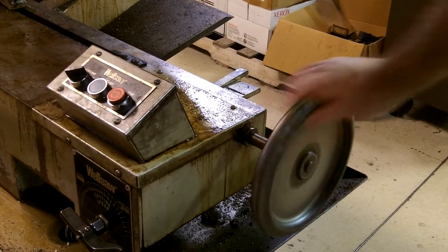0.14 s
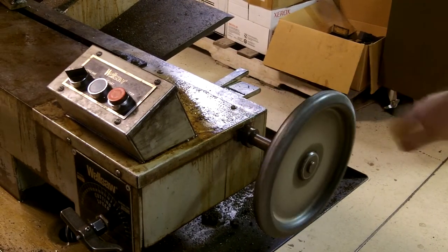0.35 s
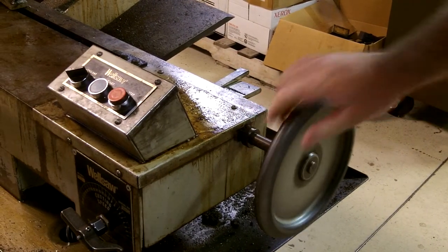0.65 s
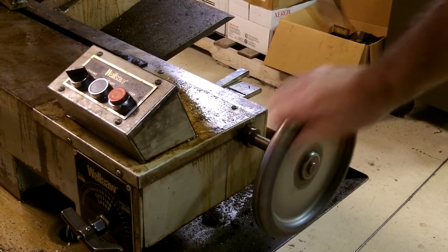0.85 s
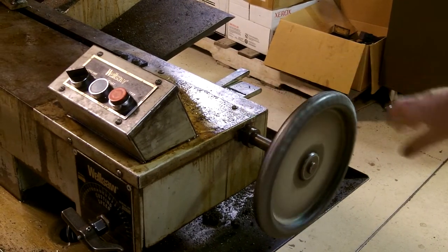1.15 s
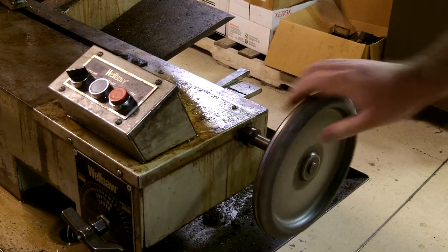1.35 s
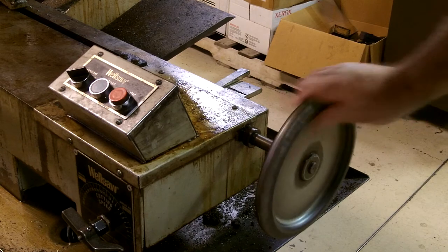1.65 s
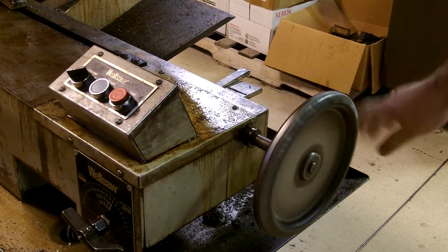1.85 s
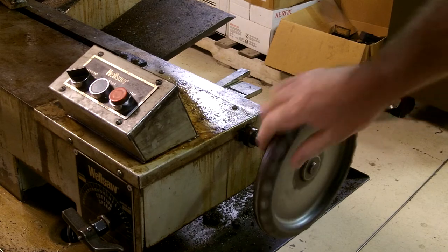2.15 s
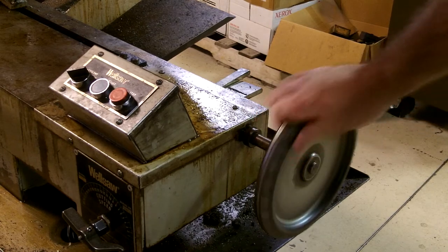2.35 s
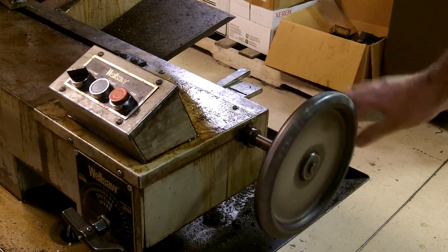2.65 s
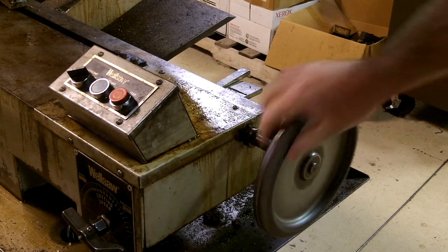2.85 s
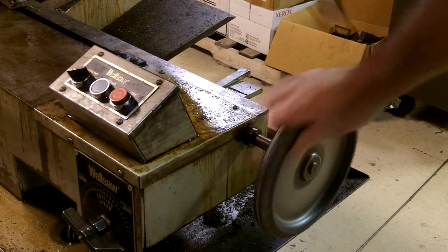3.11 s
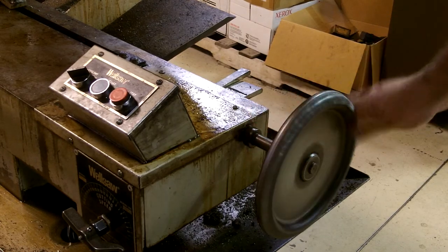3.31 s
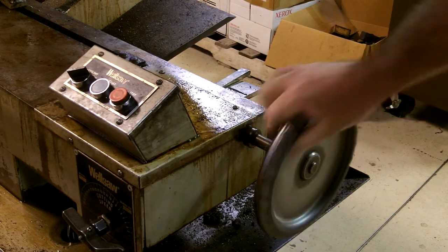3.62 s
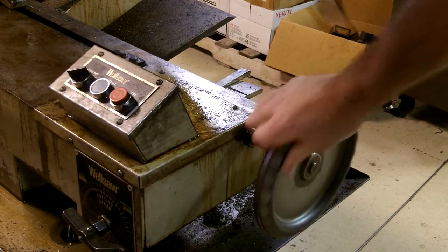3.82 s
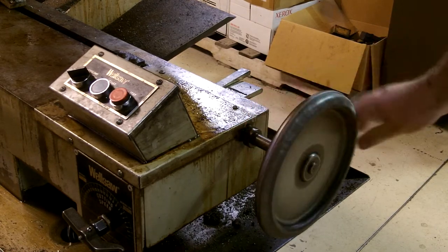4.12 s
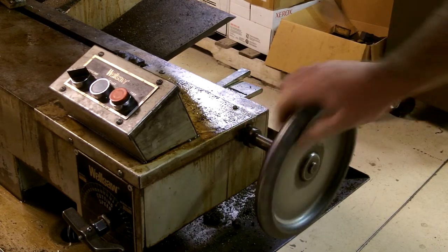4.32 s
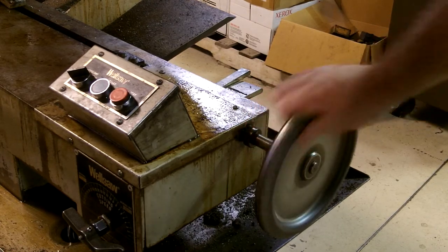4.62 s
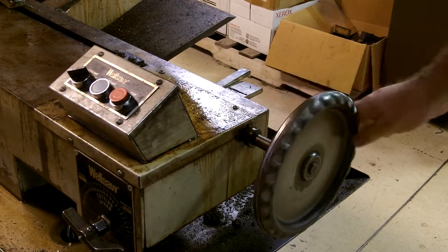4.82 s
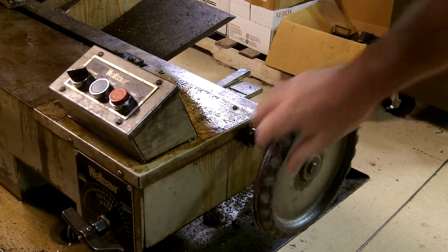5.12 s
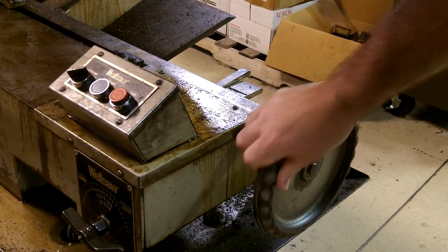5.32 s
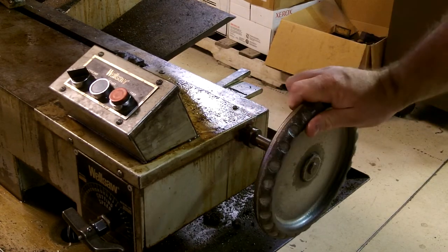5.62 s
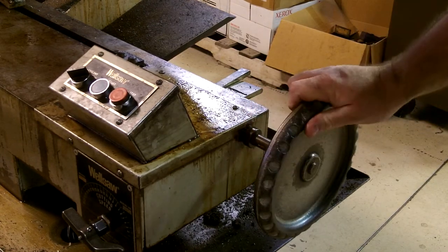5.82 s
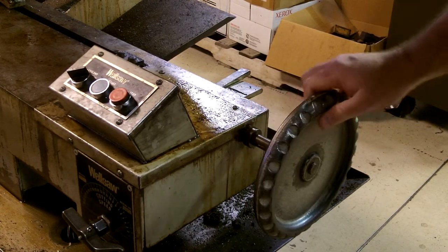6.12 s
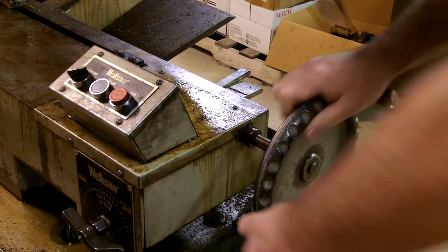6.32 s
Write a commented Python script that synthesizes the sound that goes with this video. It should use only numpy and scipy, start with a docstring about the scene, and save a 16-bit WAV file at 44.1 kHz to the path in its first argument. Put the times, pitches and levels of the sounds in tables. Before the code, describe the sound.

Metal clacks and gritty ringing scraping, three short squeaks, then a dull closing thud, with a fan rushing and a thin pulsing whine behind.

```python
"""In a workshop, a hand spins the steel feed wheel of a machine vise while a fan runs behind it.
Filtered noise and faint sines make the fan; short sagging tones pulse as a high whine like a cricket's trill.
The screw's slack takes up with two clacks of damped noise, and the jaw scrapes along its ringing bed as
many tiny catches drive its resonances. Stick and slip in the dry screw squeaks three times, as harmonics
with a breaking pitch, and the jaw closes with a thud of low decaying sines. The whine stops now and then."""
import sys
import numpy as np
from scipy import signal
from scipy.fft import rfft
from scipy.io import wavfile
from scipy.ndimage import uniform_filter1d

SR = 44100
rng = np.random.default_rng(int(sys.argv[2]) if len(sys.argv) > 2 else 0)


def waveform_to_disk(signal):
    """Save audio, clipped to [-1, 1], as 16-bit WAV at the path in sys.argv[1]."""
    frames = np.transpose(np.atleast_2d(signal))
    scaled = np.clip(frames, -1, 1) * 32767
    samples = np.round(scaled).astype(np.int16)
    wavfile.write(sys.argv[1], SR, samples)


N = 284886
TIME = np.arange(N) / SR

# Levels in the tables are relative: the functions still shape and mix them.
# Fan and workshop air. Each row: frequency in Hz, density in dB per Hz.
AIR_SPECTRUM = [(20, -4.5), (24, 6), (35, 0.5), (80, -4), (125, -2.5), (160, -1), (280, 3.5), (330, -3),
                (480, -1), (680, -5.5), (930, 1), (1120, -6), (1350, -3), (1700, -6.5), (2300, -7),
                (3300, -11.5), (4700, -17.5), (6300, -13.5), (7500, -61.5)]
# Steady tones of the fan motor. Each row: frequency in Hz, level in dB.
MOTOR_TONES = [(145.3, -55), (861.3, -55), (958.2, -52.5), (1981, -55.5), (2056, -57), (2132, -60.5),
               (2643, -59.5), (3962, -82), (4199, -62.5)]
# Microphone hiss. Each row: frequency in Hz, density in dB per Hz.
HISS_SPECTRUM = [(3000, -1), (7000, -74), (8500, 7.5), (9500, 12), (11000, 9), (13000, 8), (15000, 2)]
# Stretches of the trill. Each row: start in seconds, stop in seconds.
TRILL_SPANS = [(.075, 1.414), (1.592, 2.61), (2.775, 5.04), (5.243, 6.46)]
# Course of one wing stroke. Each row: share of the stroke from 0 to 1, mean pitch in Hz, level in dB.
WING_STROKE = [(0, 5800, -24), (.13, 5740, -6), (.3, 5650, 1), (.47, 5590, -3.5), (.62, 5400, -5),
               (.8, 5175, -12), (1, 5040, -30)]
# The wheel shoves the jaw, which gathers speed and coasts to rest.
# Each row: start in seconds, rise in seconds, grinding level in dB, fade in dB per second.
JAW_SHOVES = [(.17, 0.13, -32, 60), (.605, .055, -27.5, 67), (1.045, 0.012, -43, 49),
              (5.352, 0.017, -34, 400)]
# The sliding jaw sticks and judders. Each row: start in seconds, length in seconds, ringing level in dB.
JAW_JUDDERS = [(0.172, 0.033, -22.5), (.237, .009, -23.5), (0.265, 0.034, -28.5), (.328, 0.012, -21),
               (0.419, 0.0091, -28.5), (.613, 0.034, -25), (0.646, .017, -24), (0.696, 0.022, -27),
               (0.731, 0.022, -37), (0.807, 0.013, -20), (.883, 0.0081, -19.5)]
# Modes of the jaw and its bed. Each row: frequency in Hz, width in Hz, level in dB.
BED_MODES = [(1736, 57, -35), (1947, 34, -10), (2838, 30, 4.5), (3458, 40, 1.5), (3700, 65, -9),
             (3800, 26, 1.5), (4240, 130, -12), (5000, 23, -34)]
# Colour of the grinding. Each row: frequency in Hz, density in dB per Hz.
GRIND_SPECTRUM = [(100, -33), (220, -0.5), (350, 3.5), (600, -2), (850, 0.5), (1100, -6.5), (1400, 1),
                  (2200, -12), (3300, -3), (4300, -10), (5500, -10), (7000, -45), (12000, -64)]
# Steel knocking on steel.
# Each row: start in seconds, level in dB, 60 dB decay in seconds, centre of the colour in Hz.
STEEL_CLACKS = [(0.1763, -9.5, 0.019, 4080), (.1798, -19, .05, 3940), (.2045, -11.5, 0.031, 2920),
                (0.2055, -9.5, 0.027, 3500), (.2109, -21, 0.041, 1700), (.6458, -18, 0.043, 3750),
                (2.121, -30.5, .014, 3500), (4.904, -35, 0.048, 5500), (5.386, -33, 0.024, 5500),
                (5.387, -30, 0.07, 640)]
# Colour of a clack. Each row: frequency as a multiple of the centre, density in dB per Hz.
CLACK_SPECTRUM = [(.04, -14), (.12, -16), (.35, -11.5), (.7, 1.5), (1, 1.5), (1.35, -4.5), (1.8, -17),
                  (2.6, -36), (4, -56)]
# Dull bumps of the jaw and the hand.
# Each row: start in seconds, level in dB, pitch in Hz, 60 dB decay in seconds.
DULL_THUDS = [(.332, -29, 343, .08), (0.955, -22.5, 324.5, 0.052), (5.3872, -20.5, 300, 0.049),
              (5.398, -19.5, 249, 0.078)]
# Squeaks of the screw. Each row: moment of the bite in seconds, bite level in dB, gripping pitch in Hz,
# sag in the bite in Hz, change per overtone in dB, lead-in in seconds, lead-in pitch in Hz,
# lead-in level in dB, hold in seconds, hold level in dB, lingering level in dB.
SCREW_SQUEAKS = [(1.24, -15.5, 1293, 78, 4.5, .016, 1500, -39, .033, -24, -34),
                 (1.759, -26.5, 1968, 58, -9, .016, 2050, -40, 0.026, -32, -58),
                 (2.715, -24, 1317, 34, 4, .044, 1880, -29, 0.015, -19, -42)]
# How the screw radiates. Each row: frequency in Hz, gain in dB.
SCREW_RADIATION = [(1200, 2), (2600, 2), (3700, 3), (4200, -19.5), (5100, -17), (6500, -32), (10000, -62)]

AIR_DB = -38
ROOM_T60_S = 0.41
CUTOFF_HZ = 15050
JUDDER_ATTACK_S, JUDDER_RELEASE_S = 0.0041, 0.0042
JUDDER_GRIND_DB = -10  # grinding strength against ringing strength, before the jaw's own trims
# a tick as each judder breaks loose; its level is set against that judder's ringing strength
TICK_DELAY_S, TICK_DB, TICK_T60_S, TICK_HZ = 0.0015, -9, 0.036, 3260
BITE_S = 0.0037  # half-length of the hardest grip
BREAK_AHEAD_S, BREAK_S = 0.00774, 0.0023  # the pitch breaks this long before the bite, and this fast
SQUEAK_ATTACK_S, SQUEAK_RELEASE_S = 0.0084, 0.0017
BRIGHTENING = 0.51  # dB per overtone for each dB of level
# roughness of the held tone, extra at the break, and half-length of that extra
RASP, BREAK_RASP, RASP_S = 0.056, 0.57, 0.013
LEAD_RASP, LINGER_RASP = 0.1, 0.33  # extra roughness before the thread grips, and as the grip loosens
LINGER_S, LINGER_RELEASE_S = 0.063, 0.01  # the screw sings on faintly after the hold, then dies away


def from_db(db):
    """Decibels to gain."""
    return 10 ** (np.asarray(db) / 20)


def rms_one(x):
    """Scale to unit power."""
    return x / np.sqrt(np.mean(x ** 2) + 1e-20)


def along(rows, where):
    """Each column of a table, read along its first one."""
    first, *columns = np.transpose(rows)
    return [np.interp(where, first, column) for column in columns]


def gain_at(spectrum, hz):
    """Gain of a spectrum, joined on a log-frequency axis."""
    points, level_db = np.transpose(spectrum)
    return from_db(np.interp(np.log(hz + 1e-6), np.log(points), level_db))


def coloured(x, spectrum, unit_hz=1):
    """Give a signal a spectrum, at unit power."""
    hz = np.fft.rfftfreq(len(x), 1 / SR)
    shaped = rfft(x) * gain_at(spectrum, hz / unit_hz)
    return rms_one(np.fft.irfft(shaped, len(x)))


def lowpass(x, order, hz):
    """Roll off the treble."""
    return signal.sosfilt(signal.butter(order, hz, fs=SR, output="sos"), x)


def resonate(x, hz, width_hz):
    """One resonance with unit gain on top."""
    r = np.exp(-np.pi * width_hz / SR)
    feed = np.array([1, 0, -1]) * (1 - r * r) / 2
    return signal.lfilter(feed, [1, -2 * r * np.cos(2 * np.pi * hz / SR), r * r], x)


def envelope(t, attack_s, hold_s, release_s):
    """Rise from time zero, hold until hold_s, then die away."""
    return np.clip(t / attack_s, 0, 1) * np.exp(-np.maximum(t - hold_s, 0) / release_s)


def add(out, s, sound):
    """Mix a sound in at a time in seconds."""
    part = out[max(round(s * SR), 0):][:len(sound)]
    part += sound[:len(part)]


def room(x, wet_db, dull_hz, fresh_s=0.025):
    """The direct sound plus the workshop's dense reflections, which lose their treble as they die."""
    t = TIME[:SR]
    bright = rng.standard_normal(SR)
    dull = lowpass(bright, 2, min(dull_hz, 0.45 * SR))
    fresh = np.exp(-t / fresh_s)
    decay = from_db(-60 * t / ROOM_T60_S) * (t > 0.004)  # a short gap before the reflections
    tail = (fresh * bright + (1 - fresh) * dull) * decay / np.linalg.norm(decay)
    return x + from_db(wet_db) * signal.fftconvolve(x, tail)[:N]


def fan(hum_db=-1.0, wander=0.012):
    """Rushing air and the motor's faint tones, whose phases wander slightly."""
    sound = from_db(AIR_DB) * coloured(rng.standard_normal(N), AIR_SPECTRUM)
    for hz, db in MOTOR_TONES:
        drift = wander * np.cumsum(rng.standard_normal(N))
        sound += from_db(db + hum_db) * np.sqrt(2) * np.sin(2 * np.pi * hz * TIME + drift)
    return sound


def trill(stroke_s=0.01216, strokes_per_s=72.7, pitch_spread=0.0035, uneven_db=1.0,
          timing_s=0.0006, limp_db=0.9):
    """Every wing stroke is a short tone that sags as the wing slows; strong and weak strokes alternate."""
    out, t = np.zeros(N), TIME[:int(stroke_s * SR)]
    hz, level_db = along(WING_STROKE, t / stroke_s)
    for start, stop in TRILL_SPANS:
        times = np.arange(start, stop, 1 / strokes_per_s)
        chance = rng.standard_normal((len(times), 4))
        # timing errors partly carry over to the next stroke
        times = times + timing_s * signal.lfilter([1], [1, -0.8], chance[:, 0])
        for k, (s, (_, sharp, force, angle)) in enumerate(zip(times, chance)):
            phase = 2 * np.pi * (np.cumsum(hz * (1 + pitch_spread * sharp)) / SR + angle)
            stroke_db = level_db + uneven_db * force + limp_db * (-1) ** k
            add(out, s, from_db(stroke_db) * np.sin(phase))
    return out


def sliding(shove_ring_db=-15):
    """Strength of the ringing and of the grinding: shoves mostly grind, judders mostly ring."""
    shoves, judders, t = np.zeros(N), np.zeros(N), TIME[:SR]
    for s, rise_s, db, fade_db_per_s in JAW_SHOVES:
        coast_db = db - fade_db_per_s * np.maximum(t - rise_s, 0)
        add(shoves, s, np.minimum(t / rise_s, 1) * from_db(coast_db))
    for s, length_s, db in JAW_JUDDERS:
        add(judders, s, from_db(db) * envelope(t, JUDDER_ATTACK_S, length_s, JUDDER_RELEASE_S))
    ringing = np.hypot(judders, from_db(shove_ring_db) * shoves)
    grinding = np.hypot(shoves, from_db(JUDDER_GRIND_DB) * judders)
    return ringing, grinding


def jaw(catches_per_s=3500, size_spread_db=4.0, ring_db=-2.5, grind_db=-1.5, contact_hz=5200):
    """Tiny catches of the sliding jaw grind and keep the bed's modes ringing; oil softens the drive."""
    ringing, grinding = sliding()
    sizes = from_db(size_spread_db * rng.standard_normal(N)) * rng.choice([-1, 1], N)
    catches = rms_one(sizes * (rng.random(N) < catches_per_s / SR))
    drive = lowpass(catches * (ringing * from_db(ring_db) + 1e-18), 4, contact_hz)
    ring = sum(from_db(db) * resonate(drive, hz, width) for hz, width, db in BED_MODES)
    power = sum(from_db(db) ** 2 * np.pi * width / SR for hz, width, db in BED_MODES)
    grind = grinding * from_db(grind_db) * coloured(catches, GRIND_SPECTRUM)
    return ring / np.sqrt(power) + grind


def clacks(contact_s=0.00031):
    """Quickly damped, coloured noise stands for many steel modes building up over the contact time."""
    out, t = np.zeros(N), TIME[:SR // 10]
    # every judder adds a light knock
    ticks = [(s + TICK_DELAY_S, db + TICK_DB, TICK_T60_S, TICK_HZ) for s, _, db in JAW_JUDDERS]
    for s, level_db, t60, centre_hz in [*STEEL_CLACKS, *ticks]:
        crack = coloured(rng.choice([-1., 1.], len(t)), CLACK_SPECTRUM, centre_hz)
        add(out, s, crack * from_db(level_db - 60 * t / t60) * (1 - np.exp(-t / contact_s)))
    return out


def thuds(rise_s=0.0013):
    """Soft blows set the heavy base swinging, as low sines that die away fast."""
    out, t = np.zeros(N), TIME[:SR // 4]
    for s, level_db, hz, t60 in DULL_THUDS:
        swing = np.sin(2 * np.pi * hz * t)
        add(out, s, swing * from_db(level_db - 60 * t / t60) * (1 - np.exp(-t / rise_s)))
    return out


def squeaks(waver=0.041, flutter=0.39, count=7):
    """Stick and slip in the dry thread: a thin lead-in breaks downward, bites, holds and lingers."""
    out, order = np.zeros(N), np.arange(1, count + 1)[:, None]
    age = TIME[:SR // 5]
    for (s, bite_db, grip_hz, sag_hz, overtone_db, lead_s, lead_hz, lead_db,
         hold_s, hold_db, linger_db) in SCREW_SQUEAKS:
        t = age - lead_s  # zero at the bite
        gripped = (1 + np.tanh((t + BREAK_AHEAD_S) / BREAK_S / 2)) / 2
        bite = np.exp(-(t / BITE_S) ** 2)

        pressed = (1 - gripped) * from_db(lead_db) + gripped * from_db(hold_db) + bite * from_db(bite_db)
        pressed *= envelope(age, SQUEAK_ATTACK_S, lead_s + hold_s, SQUEAK_RELEASE_S)
        fading = envelope(age, SQUEAK_ATTACK_S, lead_s + hold_s + LINGER_S, LINGER_RELEASE_S)
        level = np.maximum(pressed, gripped * from_db(linger_db) * fading)

        # louder is brighter
        tilt_db = overtone_db + BRIGHTENING * 20 * np.log10(level / level.max() + 1e-6)

        # the slips turn most irregular at the break
        rasp = RASP + LEAD_RASP * (1 - gripped) + LINGER_RASP * (t > hold_s)
        rasp += BREAK_RASP * np.exp(-((t + BREAK_AHEAD_S) / RASP_S) ** 2)
        smooth = uniform_filter1d(uniform_filter1d(rng.standard_normal((2, SR)), size=30), size=24)
        shake, stutter = rms_one(smooth)[:, :len(t)]

        hz = lead_hz + (grip_hz - lead_hz) * gripped - sag_hz * bite
        hz = hz * (1 + waver * rasp * shake)
        weights = gain_at(SCREW_RADIATION, order * hz) * from_db(tilt_db * (order - 1))
        harmonics = weights * np.sin(2 * np.pi * order * np.cumsum(hz) / SR)
        tone = harmonics.sum(0) / np.sqrt((weights ** 2).sum(0) / 2)
        unsteady = (1 + flutter * rasp * stutter) / np.hypot(1, flutter * rasp)
        add(out, s - lead_s, level * tone * unsteady)
    return out


def scene():
    """The vise is close, the trill far off in the room; one microphone feeds both channels."""
    whine = from_db(-32.0) * room(trill(), wet_db=2.0, dull_hz=12200)
    vise = room(jaw() + clacks() + thuds(), wet_db=-7.5, dull_hz=3000)
    screw = room(squeaks(), wet_db=1.5, dull_hz=1700, fresh_s=0.02)
    hiss = from_db(-62.0) * coloured(rng.standard_normal(N), HISS_SPECTRUM)
    return np.tile(fan() + whine + vise + screw + hiss, (2, 1))


def record(dry, notch_hz=7750, notch_width_hz=1500):
    """The microphone has a hollow in the treble, a notch passed twice, and the top is cut."""
    hollow = signal.iirnotch(notch_hz, notch_hz / notch_width_hz, fs=SR)
    sound = signal.lfilter(*hollow, signal.lfilter(*hollow, dry))
    return signal.sosfilt(signal.ellip(10, 0.1, 70, CUTOFF_HZ, fs=SR, output="sos"), sound)


dry = scene()
out = record(dry)
waveform_to_disk(out)
```